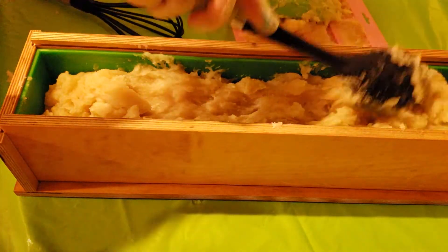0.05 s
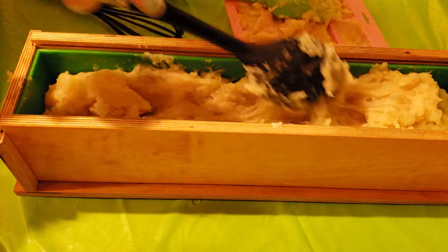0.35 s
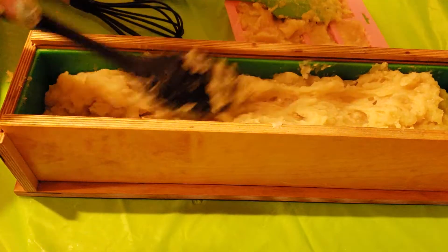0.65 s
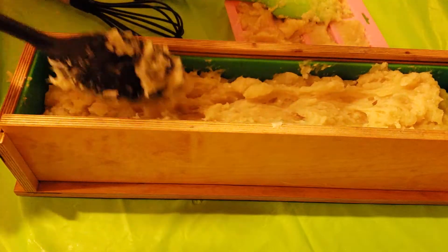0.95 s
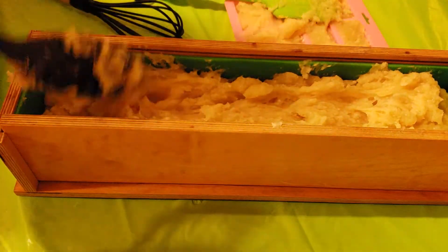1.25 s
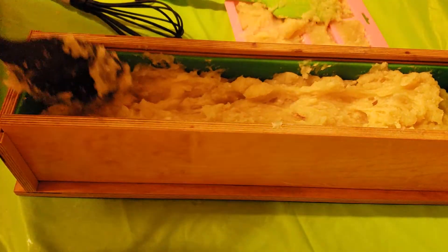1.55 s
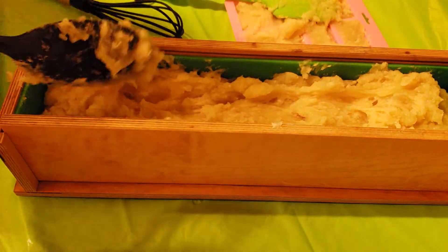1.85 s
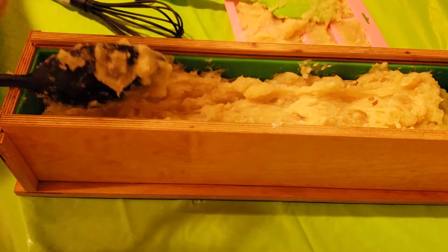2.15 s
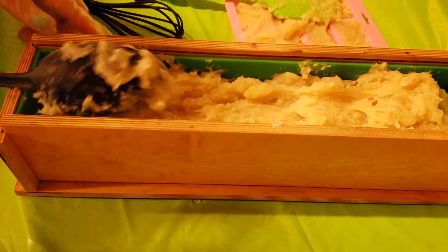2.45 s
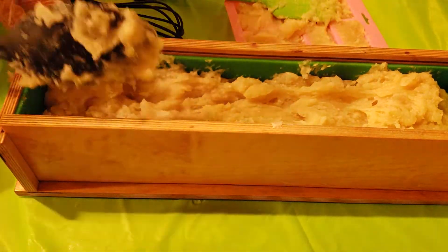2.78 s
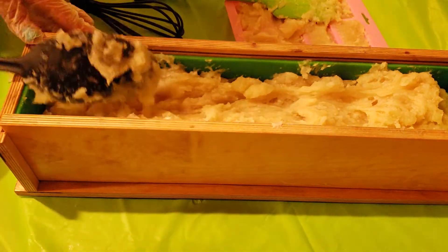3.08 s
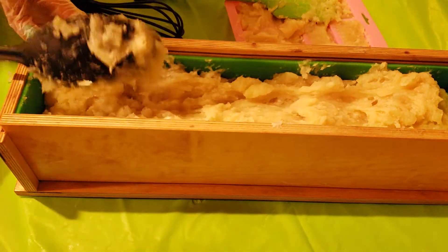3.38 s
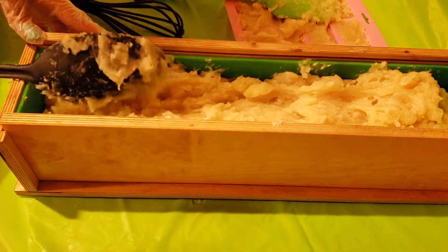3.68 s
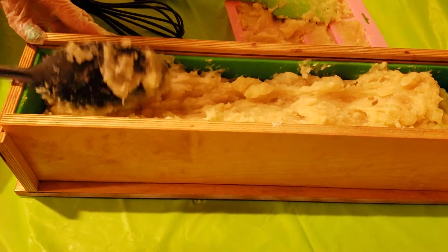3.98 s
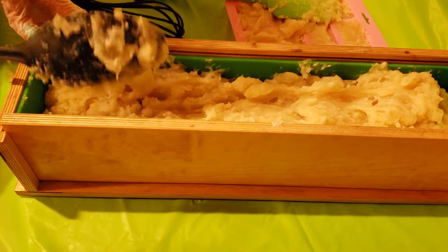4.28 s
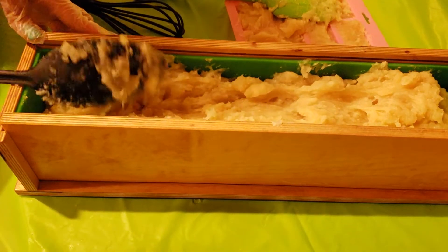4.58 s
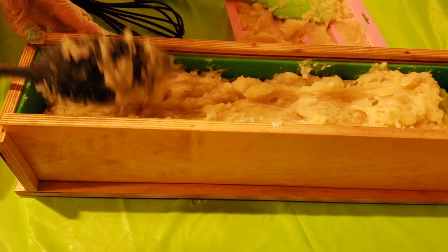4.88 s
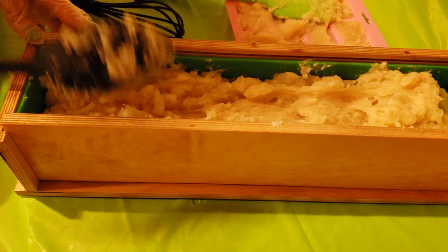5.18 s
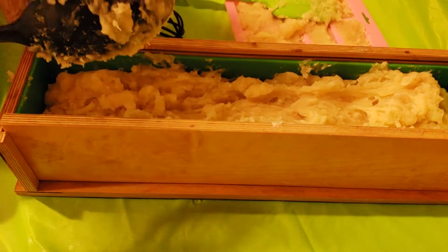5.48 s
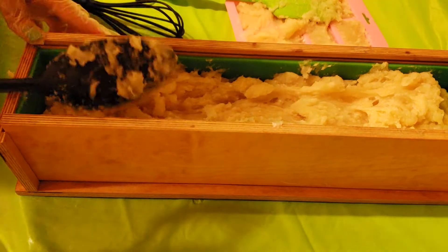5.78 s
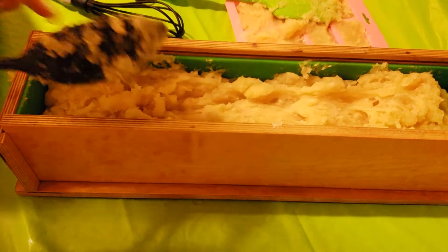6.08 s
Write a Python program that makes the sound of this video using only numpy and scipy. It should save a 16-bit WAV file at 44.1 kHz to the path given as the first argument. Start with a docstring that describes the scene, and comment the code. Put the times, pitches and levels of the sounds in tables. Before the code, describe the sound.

A plastic spoon works thick soap batter in a wooden mold, heard close in a small, dry room. For the first two seconds there are only very faint smears and sticky ticks, the clearest at 0.7 seconds. From about 2 seconds the smearing grows into a soft hiss, with a muffled bump at 2.1 and a short wet squelch at 2.5. At 3 seconds the spoon starts knocking on the rim, much louder: eleven even knocks, four or five per second, until 5.3. Each is a sharp plastic clack with a brief wooden ring and a dull table thump. The pitch falls over the last few, and a final knock lands at 5.7. The last three leave something faintly rattling on the table. A barely audible smear follows around 6.2 seconds. A faint electrical hum and low room rumble continue throughout.

```python
"""A small, dry room: a plastic spoon smears thick soap batter into a wooden loaf mold, then knocks
on the rim a dozen times. Each knock clacks in the spoon, rings the mold's boards and thumps the table;
close surfaces and the room answer. The last knocks set something on the table bouncing.
The batter ticks, hisses and squelches softly under the spoon, over faint mains hum and room rumble."""
import sys
import numpy as np
from scipy import signal
from scipy.fft import rfft, irfft
from scipy.io import wavfile
from scipy.ndimage import uniform_filter1d

SR = 44100
rng = np.random.default_rng(int(sys.argv[2]) if len(sys.argv) > 2 else 0)


def dump(signal):
    """Clip the signal to [-1, 1] and save it as 16-bit WAV at the path in sys.argv[1]."""
    limited = np.clip(np.atleast_2d(signal).T, -1, 1)
    pcm = np.round(limited * 32767).astype(np.int16)
    wavfile.write(sys.argv[1], SR, pcm)


N = 279338
TIME_S = np.arange(N) / SR
RING_S = TIME_S[:SR * 2 // 3]  # time axis of one hit

# spoon on rim: start_s, pitch_hz, strength_db (re usual knock), hardness_db, batter_cushion (0-1)
KNOCKS = [(2.1161, 1110, -14, -3, 0.98), (2.1737, 1080, -21, -4, .6), (2.9771, 1220, 3, -5.5, 0.04),
          (3.2592, 1143, -4, -8.5, 0.05), (3.4712, 1263, .5, -4.5, 0), (3.698, 1240, -0.5, 3, 0),
          (3.9172, 1240, 2, 2.5, 0.07), (4.142, 1174, -.5, 4, 0), (4.3736, 1217, 2, -5, 0),
          (4.5919, 1207, -1, 1.5, 0), (4.8207, 1120, 0, 5.5, 0.01), (5.0312, 1040, 0, 6, 0),
          (5.2535, 974, -.5, 2.5, 0), (5.7, 938, 2, -4.5, 0.04)]
WOOD_DB_PER_DB = .8  # wood level against knock strength


def knocks(near, tail):
    """Each knock drives spoon, mold and table; the pitch drops as the contact point shifts."""
    out = np.zeros((2, N))
    for start_s, pitch_hz, strength_db, hardness_db, cushion in KNOCKS:
        drop_oct = pitch_drop_oct(pitch_hz)
        push_db = table_push_db(pitch_hz, strength_db)
        cushion_db_per_oct = -12 * cushion
        scatter = room_tail(build_s=0.0029)  # moving arm and spoon scatter the reflections anew
        paths = near + undb(-11) * tail + undb(-8) * scatter
        knock = spoon_clack(pitch_hz, strength_db, paths)
        knock += table_thump(push_db)
        knock += mold_boards(strength_db, drop_oct, cushion, cushion_db_per_oct)
        knock += thud(push_db + .4 * cushion_db_per_oct, tail)
        knock += rim_contact(strength_db, hardness_db, drop_oct, scatter, tail)
        add(out, start_s, knock)
    return out


def spoon_clack(pitch_hz, strength_db, paths, width_hz=640):
    """Heavily damped bending resonance of the loaded spoon; nothing passes far above its pitch."""
    b, a = signal.iirpeak(pitch_hz, pitch_hz / width_hz, fs=SR)
    swing = signal.lfilter(b, a, signal.unit_impulse(len(RING_S)))
    swing = signal.lfilter(b, a, swing)
    swing = signal.sosfilt(signal.butter(3, 1.48 * pitch_hz, fs=SR, output="sos"), swing)
    return undb(-19 + strength_db) * unit_hit(convolve(swing, paths)) * ears(.3, -.3)


def table_thump(push_db):
    """Low modes of the table under the mold."""
    # pitch_hz, level_db, t60_s
    table_modes = [(25.9, -41, 0.9), (68.2, -39.5, 0.75), (74.4, -40, 0.83), (92.4, -19.5, 0.1),
                   (108.85, -40, 0.9), (131.8, -25, 0.21), (165.8, -25, 0.15), (187.1, -29, 0.2),
                   (212, -31, 0.23), (237.6, -37, 0.29)]
    thump = ring(table_modes, push_s=0.002, scatter_db=2, side_db=-15.5)
    return undb(-28 + push_db) * thump * ears(-.9, .9)


def mold_boards(strength_db, drop_oct, cushion, tilt_db_per_oct):
    """The filled mold rings, more under a lower clack; a batter cushion pushes it slowly."""
    # pitch_hz, level_db, t60_s
    mold_modes = [(279, -44.5, 0.35), (319.5, -20, 0.2), (391, -33.5, 0.26), (501, -27.5, 0.13),
                  (592.4, -25, 0.11), (649, -45, 0.41), (755, -34, 0.24)]
    level_db = -30.5 + WOOD_DB_PER_DB * strength_db + 16 * drop_oct + 10.5 * cushion
    return undb(level_db) * ring(mold_modes, push_s=0.0035, scatter_db=0.5, side_db=-16,
                                 tilt_db_per_oct=tilt_db_per_oct, detune=0.007)


def thud(push_db, tail):
    """Dull body of a blow, with its room reflections."""
    # freq_hz, level_db
    thud_spectrum = [(40, -26), (75, 3), (110, -2.5), (250, -8), (450, -3.5), (650, -1), (850, -3.5),
                     (1200, -18), (3000, -53), (9000, -77)]
    impact = contact(t60_s=0.03, grit=0.19)[0] + undb(1.5) * tail
    return undb(-33 + push_db) * unit_hit(colour(impact, thud_spectrum))


def rim_contact(strength_db, hardness_db, drop_oct, scatter, tail):
    """Bright edge of a knock: rap, spoon overtones and crack. Stronger knocks are brighter."""
    # hard contact: freq_hz, level_db
    rap_spectrum = [(1200, -10.5), (1700, 0.5), (1980, -6.5), (2170, 5.5), (2320, 0), (2600, 1.5),
                    (3300, -0.5), (4000, -5), (5000, -16.5), (8000, -39.5), (15000, -54.5)]
    crack_spectrum = [(1500, -19.5), (2800, -6.5), (3800, 1), (4700, 8), (5200, 4.5), (5800, 7),
                      (6500, 0.5), (7300, 1), (8400, -5.5), (11500, -7.5), (16000, -13)]
    # upper spoon modes: pitch_hz, level_db, t60_s
    spoon_modes = [(1780, -1, 0.2), (2180, -2, 0.15), (2480, -0.5, 0.094), (2650, -0.5, 0.12),
                   (2700, -1.5, .1), (3145, -6, 0.12), (4180, -7.5, 0.084)]
    edge = contact(t60_s=0.055, grit=0.31) + undb(-4) * scatter + undb(-7.5) * tail
    edge *= ears(1.3, -1.3)
    # a contact that favours the lower clack also stirs higher overtones
    rap = unit_hit(colour(edge, tilted(rap_spectrum, 30 * drop_oct, pivot_hz=2292)))
    overtones = ring(spoon_modes, push_s=0.00042, scatter_db=4, side_db=1, detune=0.0046)
    # a harder contact is shorter and reaches higher
    crack_db_per_oct = -1.6 + 0.51 * hardness_db - 22 * drop_oct
    crack = unit_hit(colour(edge, tilted(crack_spectrum, crack_db_per_oct, pivot_hz=4520)))
    drive_db = 1.4 * strength_db + 0.52 * hardness_db
    return (undb(-35 + drive_db) * rap + undb(-39.5 + drive_db) * overtones
            + undb(-42 + strength_db + hardness_db) * crack)


def pitch_drop_oct(pitch_hz, usual_hz=1195):
    """Distance of the spoon below its usual pitch."""
    return np.log2(usual_hz / pitch_hz)


def table_push_db(pitch_hz, strength_db):
    """Table drive re a usual knock; a lower clack passes more of the blow to the wood."""
    return WOOD_DB_PER_DB * strength_db + 5.5 * pitch_drop_oct(pitch_hz)


def batter_smear(tail, grain_db=4.5):
    """Dense tiny ruptures fizz as the batter slides; pressing harder adds a low squelch."""
    # spoon sliding, spoon bearing down: peak_s, length_s, level_db
    strokes = [(.375, .2, -67.5), (.53, 0.49, -69), (.76, 0.36, -67), (1.26, .8, -67), (1.98, 0.52, -56.5),
               (2.17, 0.39, -55), (2.35, 0.18, -49.5), (2.515, 0.21, -48), (2.65, 0.41, -54),
               (6.23, 0.92, -65.5)]
    presses = [(2.03, 0.71, -58), (2.52, 0.099, -37.5), (2.615, .11, -46)]
    # freq_hz, level_db
    fizz_spectrum = [(1000, -23), (2000, -4.5), (4000, 1.5), (7000, -3), (9000, -3.5), (13000, 0.5),
                     (16000, -5.5)]
    squelch_spectrum = [(150, -11.5), (330, -2), (600, -9), (760, 0.5), (880, 2), (1050, -8), (1350, -6.5),
                        (1900, -18), (4000, -39.5)]
    grains = rng.standard_normal((2, N)) * undb(grain_db * rng.standard_normal((2, N)))
    fizz = unit(colour(grains, fizz_spectrum)) * swells(strokes) * ears(4, .8)
    squelch = unit(colour(convolve(grains[0], tail), squelch_spectrum)) * swells(presses)
    return fizz + squelch * undb(1.9 * drift(51))


def batter_ticks():
    """Air pockets snap open; large ones sound duller, with a hollow plop."""
    # sticky batter letting go: start_s, level_db, tilt_db_per_oct
    pockets = [(.354, -75, 9), (.497, -60, 2), (0.695, -48.5, 0), (.757, -72, 10), (.82, -69.5, 3),
               (1.295, -66.5, 2), (1.9125, -60, 8), (5.945, -73, 3)]
    # freq_hz, level_db
    tick_spectrum = [(300, -3), (700, 0), (1100, 5), (1400, 2), (1850, 3), (2600, -17.5), (3300, 1.5),
                     (4500, -10), (8000, -14), (10500, -11), (16000, -23)]
    # pitch_hz, level_db, t60_s
    plop_modes = [(443, 0, 0.093), (487, -0.5, 0.12), (579, 1, 0.076)]
    out = np.zeros((2, N))
    for start_s, tick_db, tilt_db_per_oct in pockets:
        snap = contact(t60_s=0.057, grit=0.17) + undb(-4) * room_tail()
        snap = colour(snap, tilted(tick_spectrum, tilt_db_per_oct, pivot_hz=1000))
        plop = ring(plop_modes, push_s=0.0017, scatter_db=3.5, side_db=-12)
        plop_db = tick_db + 3 - 2.5 * tilt_db_per_oct
        add(out, start_s, undb(tick_db) * unit_hit(snap) + undb(plop_db) * plop)
    return out


def rattles(from_s=5, bounces=3, gap_s=.052, loss_db=4.5):
    """Something on the table bounces after the last knocks: small contacts plus room reflections."""
    # freq_hz, level_db
    rattle_spectrum = [(1500, -12), (2800, -7), (3700, -5), (4300, 3), (5000, -8), (6000, -20),
                       (12000, -25)]
    out = np.zeros((2, N))
    for start_s, pitch_hz, strength_db, _, _ in KNOCKS:
        if start_s > from_s:
            for k in range(bounces):
                level_db = -62.5 + table_push_db(pitch_hz, strength_db) - loss_db * k
                bounce = colour(contact(t60_s=.04, grit=.4) + room_tail(), rattle_spectrum)
                add(out, start_s + gap_s * (k + 1), undb(level_db) * unit_hit(bounce))
    return out


def near_paths():
    """Direct sound and first reflections off close surfaces; unit mean energy per ear."""
    # left_delay_s, left_db, right_delay_s, right_db
    paths = [(0.00018, -5.5, 0.00035, -10.5), (0.00322, -3, 0.002991, -2.5), (0.00553, -10, 0.00388, -13.5),
             (0.00844, -8, 0.00526, -1), (0.01, -9.5, 0.00549, -5.5), (0.0135, -14, 0.0057, -5.5),
             (0.01907, -10.5, 0.011, -22.5)]
    out = np.zeros((2, len(RING_S)))
    for left_s, left_db, right_s, right_db in paths:
        out[0, int(left_s * SR)] += undb(left_db)
        out[1, int(right_s * SR)] += undb(right_db)
    return out / np.sqrt(np.sum(out ** 2) / 2)


def room_tail(build_s=0.006):
    """Diffuse reflections of unit energy, different at each ear; the bass lasts longest."""
    # room decay: band_hz, t60_s
    bands = [(150, .3), (500, 0.26), (1300, 0.18), (3000, 0.23), (5000, 0.2), (12000, 0.19)]
    band_hz, t60s = np.transpose(bands)
    hz = np.fft.rfftfreq(len(RING_S), 1 / SR)
    spectrum = np.exp(2j * np.pi * rng.random((2, len(hz))))
    tail = sum(irfft(spectrum * along(np.c_[band_hz, share], hz)) * fade(t60_s)
               for share, t60_s in zip(np.eye(len(bands)), t60s))
    tail *= 1 - np.exp(-RING_S / build_s)
    return unit(tail) / np.sqrt(len(RING_S))


def mains_hum():
    """Faint tones wavering in level and phase."""
    # pitch_hz, level_db
    tones = [(59.5, -66.5), (119.6, -53.5), (269.2, -65.5), (360.3, -71)]
    hum = np.zeros(N)
    for pitch_hz, level_db in tones:
        amplitude = np.sqrt(2) * undb(level_db + .7 * drift(3.9))
        hum += amplitude * np.sin(2 * np.pi * (pitch_hz * TIME_S + rng.random()) + .15 * drift(5.5))
    return hum


def room_rumble():
    """Low noise, alike at both ears in the bass, unrelated in the treble."""
    # freq_hz, level_db
    rumble_spectrum = [(20, -26.5), (30, -14.5), (45, -15), (60, 2.5), (85, -17.5), (120, -2.5),
                       (170, -8.5), (230, -11), (280, 1), (340, -10), (430, -6), (600, -19.5), (750, -24.5),
                       (950, -20.5), (1400, -35.5), (2400, -30), (3500, -40.5), (15000, -46)]
    mid, side = colour(rng.standard_normal((2, N)), rumble_spectrum)
    side = colour(side, [(60, -5.5), (300, -13.5), (700, -3.5), (1400, 0.5)])
    return unit(mid + side * np.array([[1], [-1]])) * undb(-55 + 0.8 * drift(5))


def ring(modes, push_s, scatter_db, side_db, tilt_db_per_oct=0, detune=0.017):
    """Modes started by a soft push, weighted and tuned anew per hit; normalised."""
    hz, db, t60s = np.transpose(modes)
    hz = hz * (1 + detune * rng.standard_normal(len(hz)))
    db = db + tilt_db_per_oct * np.log2(hz) + scatter_db * rng.standard_normal(len(hz))
    gains = (-1) ** np.arange(len(hz)) * undb(db)
    wave = sum(gain * fade(t60_s) * np.exp(2j * np.pi * mode_hz * RING_S)
               for mode_hz, gain, t60_s in zip(hz, gains, t60s))
    wave *= (1 - np.exp(-RING_S / push_s)) ** 2
    # reaches the two ears out of step
    return unit_hit(wave.imag - undb(side_db) * wave.real * np.array([[1], [-1]]))


def contact(t60_s, grit):
    """Sharp tick, then brief gritty chatter; unit mean energy per ear."""
    chatter = grit * rng.standard_normal((2, len(RING_S))) * fade(t60_s)
    return unit(signal.unit_impulse(len(RING_S)) + chatter) / np.sqrt(len(RING_S))


def swells(moves, rise_share=.42, depth_db=17.5):
    """Gain of movements that swell and die away, their ends depth_db under the peak."""
    power = 0
    for peak_s, length_s, level_db in moves:
        away = np.maximum((peak_s - TIME_S) / rise_share, (TIME_S - peak_s) / (1 - rise_share))
        power += undb(level_db - depth_db * away / length_s) ** 2
    return np.sqrt(power)


def colour(x, points, size=4096):
    """Minimum-phase filter from (freq_hz, level_db) points."""
    cepstrum = irfft(np.log(undb(along(points, np.fft.rfftfreq(size, 1 / SR)))))
    cepstrum[1:size // 2] *= 2
    cepstrum[size // 2 + 1:] = 0
    return convolve(x, irfft(np.exp(rfft(cepstrum))))


def tilted(points, db_per_oct, pivot_hz):
    """Tilt a spectrum above the pivot."""
    return [(hz, db + db_per_oct * np.log2(max(hz, pivot_hz) / pivot_hz)) for hz, db in points]


def along(points, hz):
    """Interpolate (freq_hz, value) points over log frequency."""
    point_hz, values = np.transpose(points)
    return np.interp(np.log(hz + 1), np.log(point_hz), values)


def convolve(x, response):
    """Filter along time, keeping the length."""
    x = np.atleast_2d(x)
    return signal.fftconvolve(x, np.atleast_2d(response), axes=-1)[:, :x.shape[-1]]


def drift(rate_hz):
    """Smooth random wander, spread near 1."""
    step = int(SR / rate_hz)
    return uniform_filter1d(np.repeat(rng.standard_normal(N // step + 1), step), step)[:N]


def fade(t60_s):
    return np.exp(-np.log(1000) * RING_S / t60_s)


def undb(db):
    return 10 ** (np.asarray(db) / 20)


def ears(left_db, right_db):
    return undb([[left_db], [right_db]])


def unit(x):
    """Scale to rms 1."""
    return x / np.sqrt(np.mean(x ** 2))


def unit_hit(x):
    """Scale to rms 1 over the first 50 ms."""
    return x / np.sqrt(np.mean(x[..., :SR // 20] ** 2))


def add(out, start_s, hit):
    start = int(start_s * SR)
    out[:, start:start + len(RING_S)] += hit[:, :N - start]


def scene():
    """Knocks, rattles and batter in one small room."""
    near, tail = near_paths(), room_tail()
    return knocks(near, tail) + rattles() + batter_ticks() + batter_smear(tail) + mains_hum() + room_rumble()


def record(dry):
    """The recorder cuts the top at 16 kHz."""
    return signal.sosfilt(signal.ellip(10, .2, 70, 16000, fs=SR, output="sos"), dry)


dry = scene()
out = record(dry)
dump(out)
```